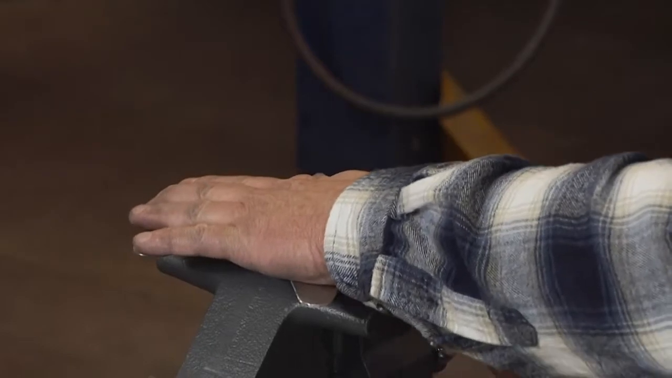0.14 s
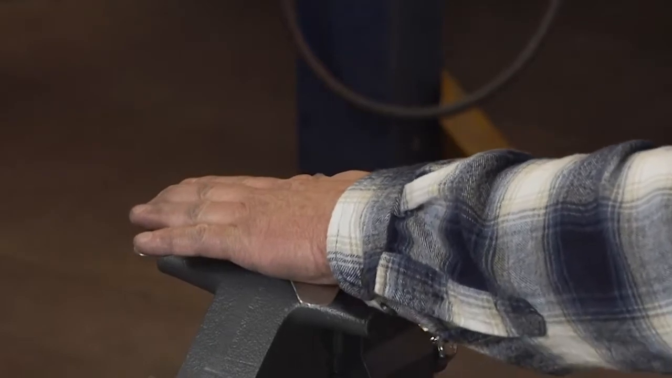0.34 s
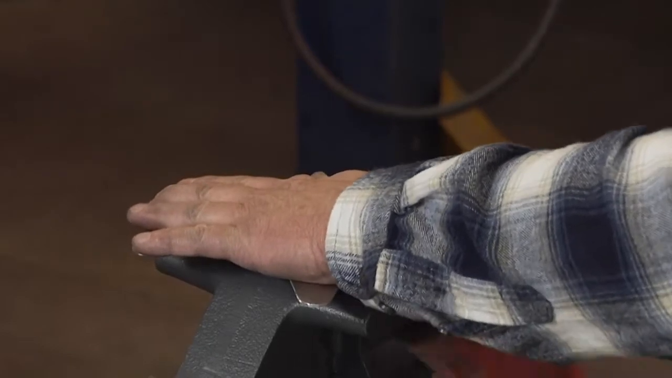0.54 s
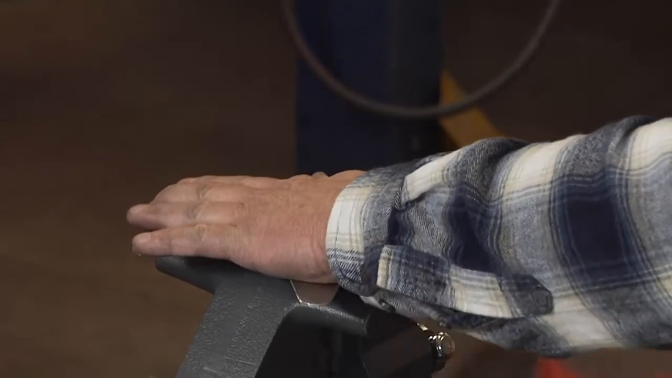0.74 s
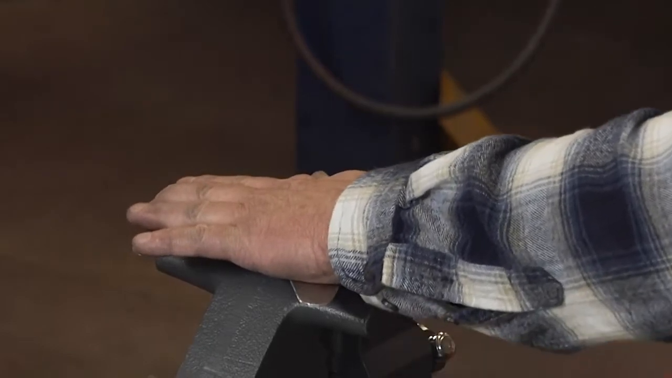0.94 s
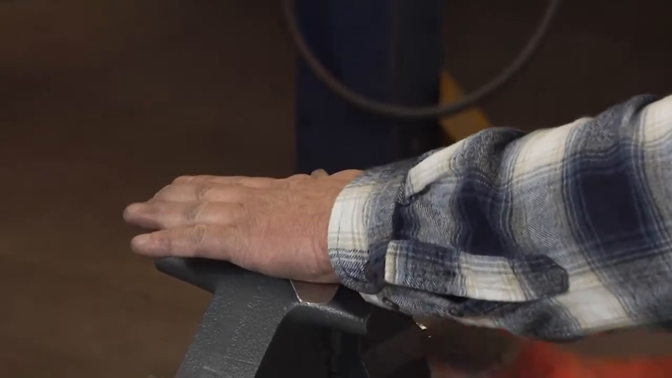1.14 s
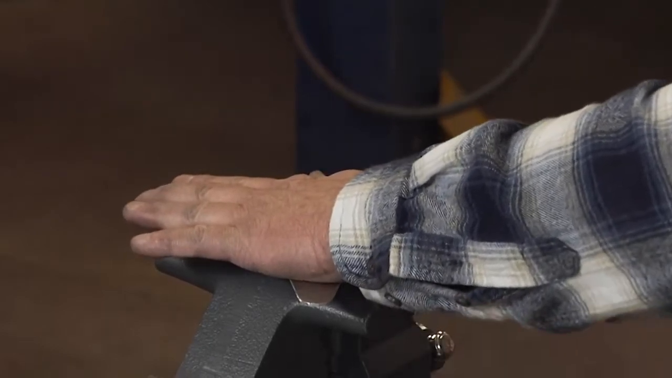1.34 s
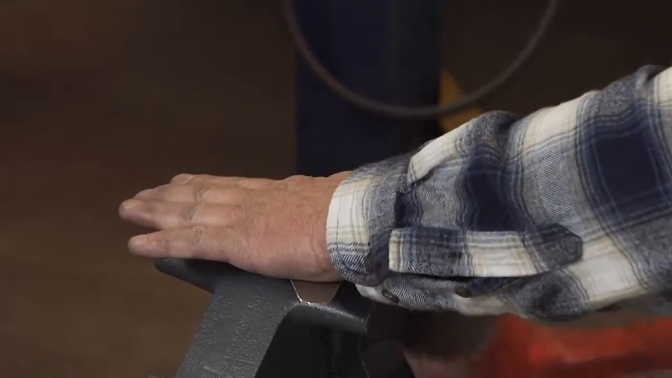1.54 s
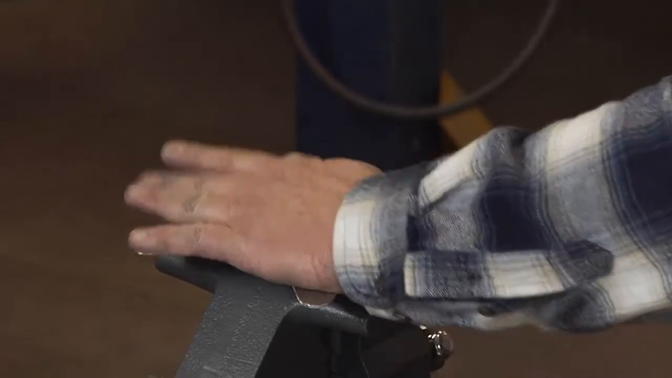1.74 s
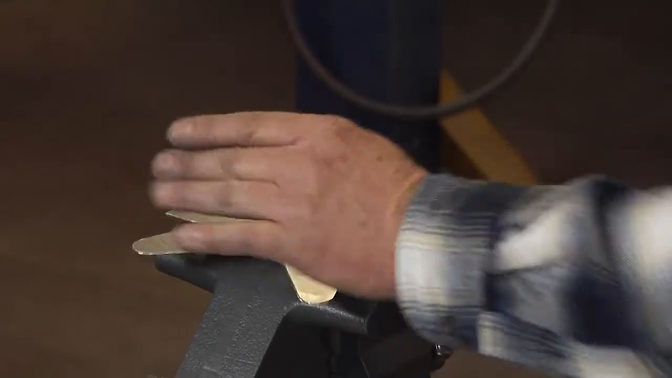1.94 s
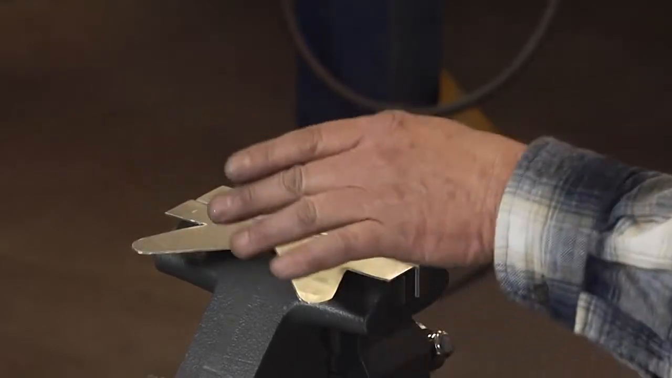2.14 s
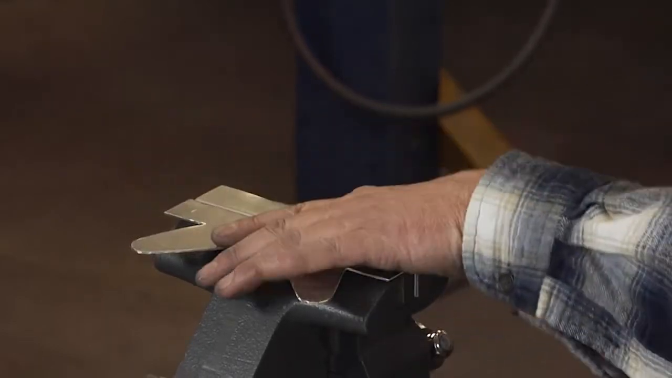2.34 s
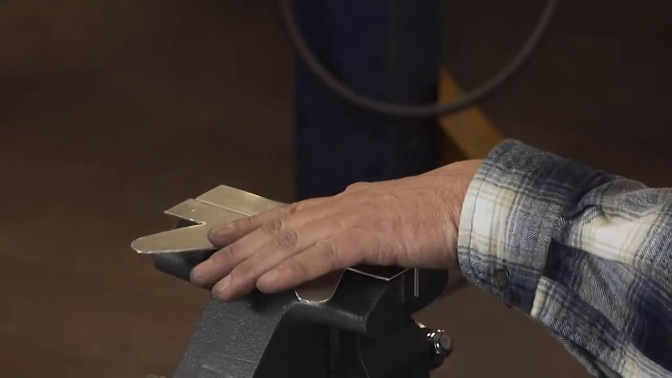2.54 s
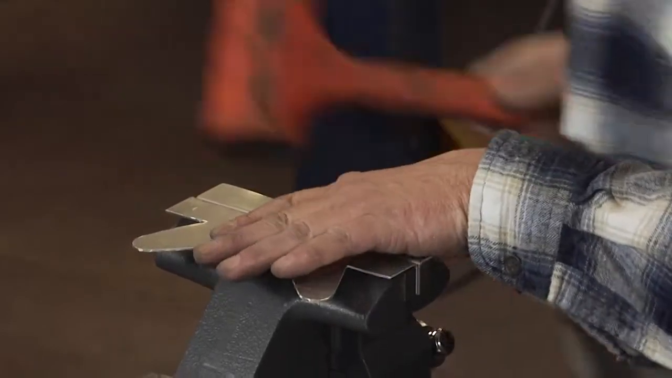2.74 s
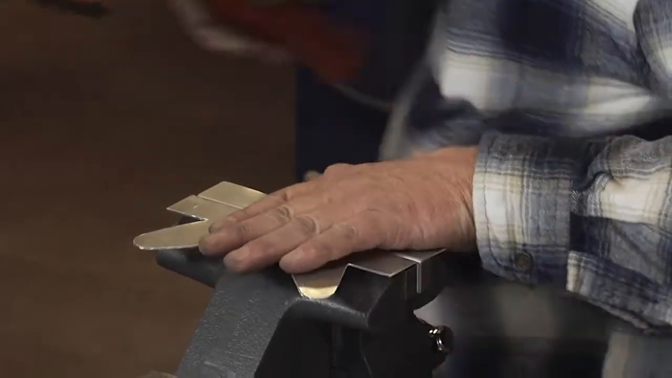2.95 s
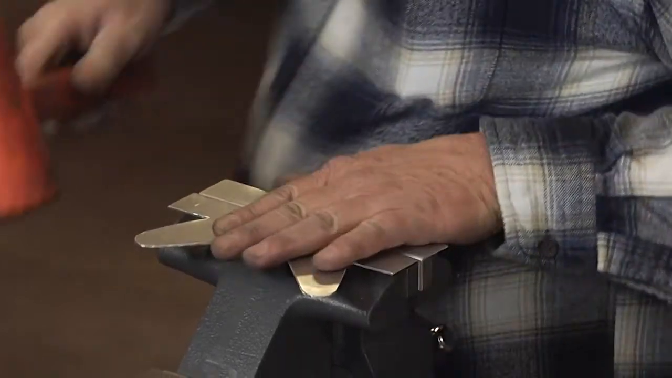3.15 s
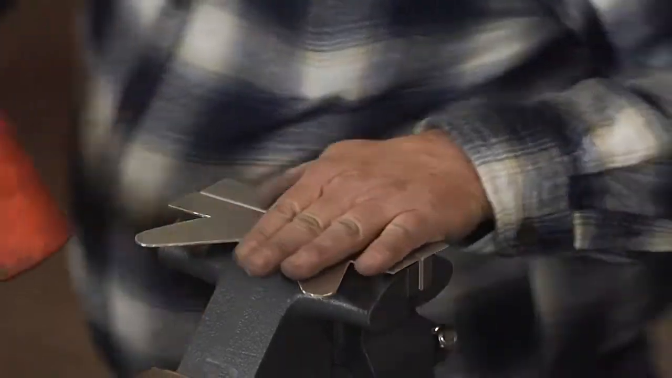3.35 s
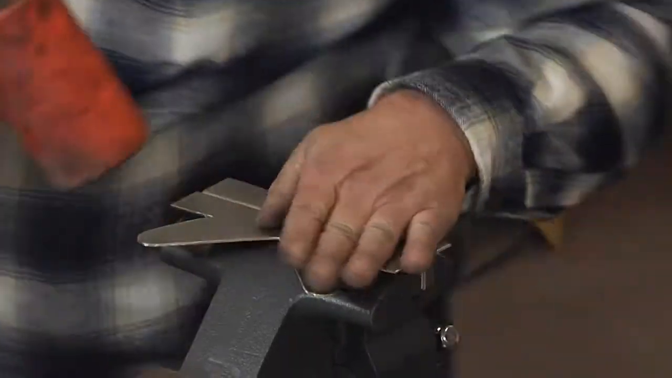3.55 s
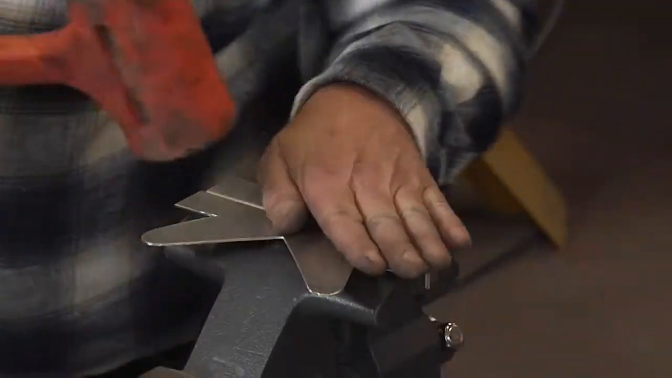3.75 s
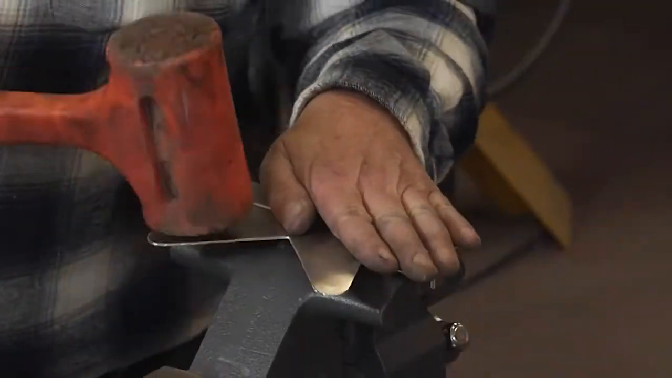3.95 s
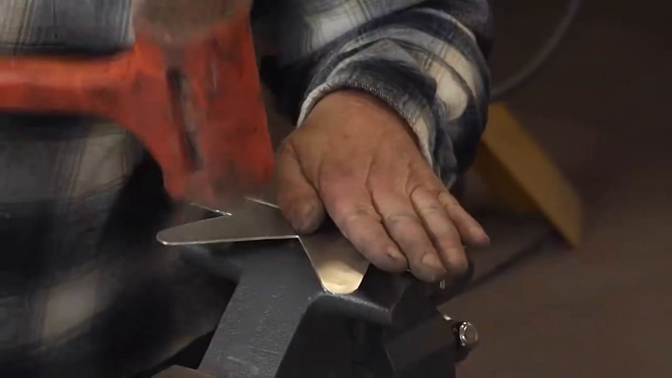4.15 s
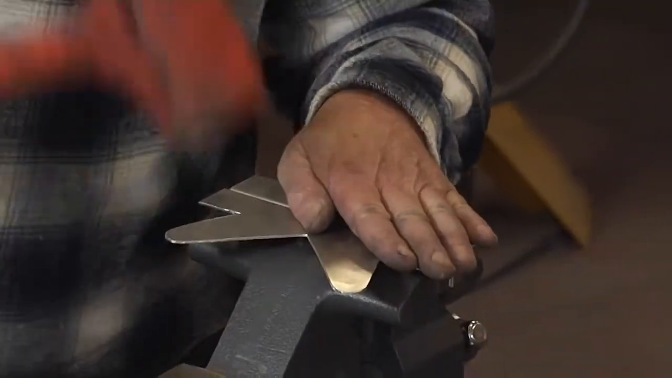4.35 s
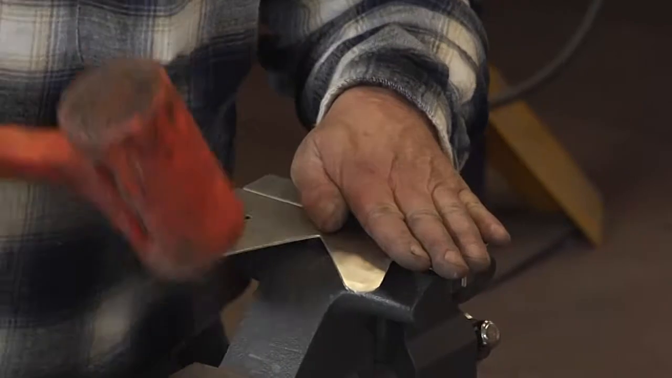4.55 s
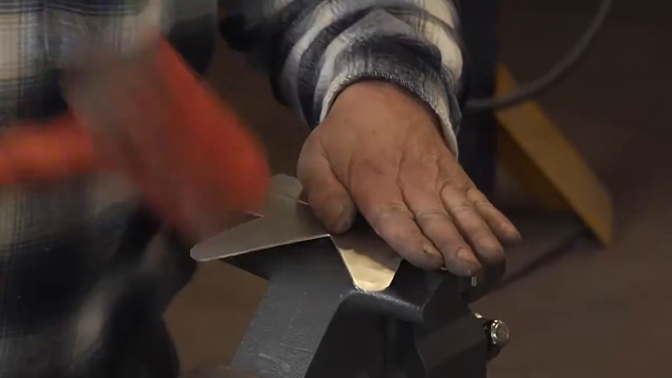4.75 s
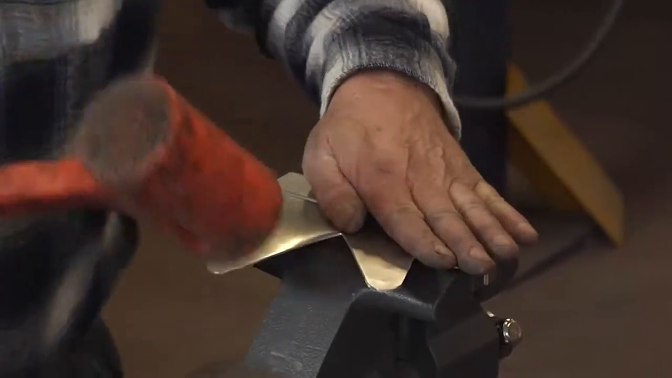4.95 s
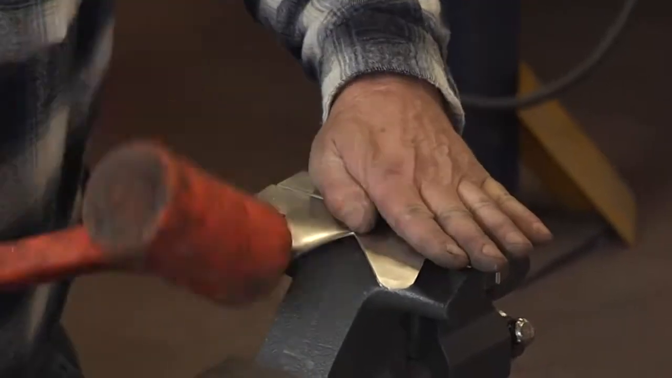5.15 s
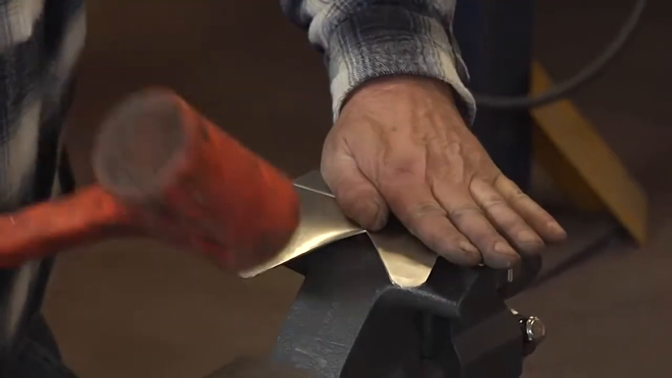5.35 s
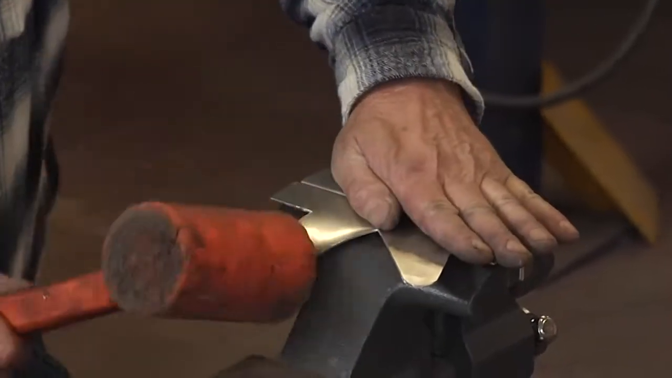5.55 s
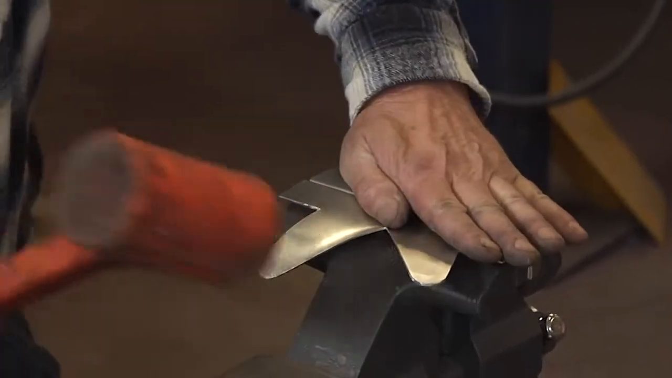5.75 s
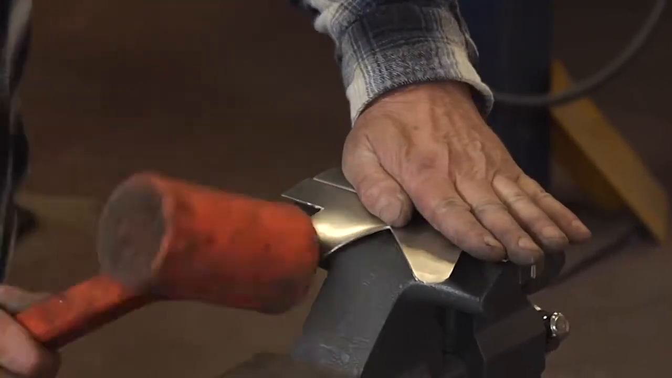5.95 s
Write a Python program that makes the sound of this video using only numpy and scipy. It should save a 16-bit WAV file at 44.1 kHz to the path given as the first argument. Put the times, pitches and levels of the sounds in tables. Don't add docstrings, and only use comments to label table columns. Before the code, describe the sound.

Close microphone at a steel vise in a large echoing workshop. Four hard mallet blows slap thin aluminium against the jaws, with brief chatter, thump and shot rattle. The echo fades into low room rumble while sleeves rustle, feet shuffle and pellets tick. Then a light tap with tiny rebounds, followed by five blows with a short, hollow sheet ring, each preceded by a hissing slide of shot.

```python
import sys
import numpy as np
from scipy import signal
from scipy.fft import rfft, irfft
from scipy.io import wavfile
from scipy.ndimage import uniform_filter1d

SR = 44100
rng = np.random.default_rng(int(sys.argv[2]) if len(sys.argv) > 2 else 0)


def to_linear_factor(level_db):
    exponent = np.asarray(level_db, float) / 20
    return 10 ** exponent


def waveform_to_disk(signal):
    frames = np.transpose(np.atleast_2d(signal))
    scaled = np.clip(frames, -1, 1) * 32767
    samples = np.round(scaled).astype(np.int16)
    wavfile.write(sys.argv[1], SR, samples)


N = 268569

# start_s, peak_db, bending_hz, upper_mode_db, ring_ms
FLAPS = [
    (3.9382, -17, 970, -1.5, 2.14),
    (4.0235, -30, 837, -11.5, 2.8),
    (4.085, -37.5, 1190, -9.5, 4.3),
    (4.4298, -9, 908, 2, 4),
    (4.8123, -10.5, 813, 1.5, 3.05),
    (5.1685, -10, 919, 2.5, 1.95),
    (5.5427, -8, 824, -3, 2.1),
    (5.974, -19.5, 772, 5.5, 5.3),
]
# arrival_s, rms_db, length_ms, slide_before_ms, shell_thud_db
SWINGS = [
    (2.315, -75, 40, 1.1, 20.5),
    (4.043, -54.5, 26.5, 1, 6),
    (4.375, -45, 25, 46, -1),
    (4.766, -43.5, 25.2, 44, -3.5),
    (5.121, -44, 23.7, 38, 1),
    (5.503, -43, 22.7, 41, 3.5),
    (5.902, -45, 38.7, 35, -2),
]
TURN_S = 3
BAND_HZ = 30 * 2 ** np.arange(0, 9.5, .5)


def secs(length):
    return np.arange(int(max(length, .0005) * SR)) / SR


def fade(t, t60):
    return np.exp(-np.log(1000) * t / max(t60, 1e-4))


def add(track, s, x):
    i = int(s * SR)
    track[i:i + len(x)] += x[:N - i]


def shape(x, gain):
    return irfft(rfft(x) * gain(np.arange(len(x) // 2 + 1) * SR / len(x) + 1e-3), len(x))


def curve(points):
    hz, db = np.transpose(points)
    return lambda f: to_linear_factor(np.interp(np.log(f), np.log(hz), db))


def peak(hz, width):
    return lambda f: 1 / np.sqrt(1 + ((f - hz ** 2 / f) / width) ** 2)


def noise(gain, size=N):
    x = shape(rng.standard_normal(size), gain)
    return x / x.std()


def flicker(size):
    return uniform_filter1d(np.repeat(rng.standard_normal(N // size + 1), size)[:N], size)


def no_bass(x, hz):
    return signal.sosfilt(signal.butter(2, hz, "high", fs=SR, output="sos"), x)


def flap():
    # mode_hz, level_db, t60_ms
    edge_modes = [(1350, 4.5, 6.4), (2020, -15.5, 7.9), (3640, -5.5, 11), (5570, -3.5, 10), (7200, -9, 4.7),
                  (8120, 1, 2.7), (11000, 5, 2.8)]
    upper_hz = 3186
    soft_below_db, dull_db_per_octave = -8, 0.5
    out, t = np.zeros(N), secs(.08)
    phases = rng.uniform(0, 2 * np.pi, (len(FLAPS), len(edge_modes)))
    crack = noise(peak(3200, 5100))

    def held(hold_ms):
        choked = np.exp(-(1000 * t / hold_ms) ** 2) + .12 * fade(t, .05)
        return (1 - np.exp(-t / .0008)) * choked

    for (s, db, hz, upper_db, ms), phase in zip(FLAPS, phases):
        upper = to_linear_factor(upper_db) * held(0.91 * ms) * np.sin(2 * np.pi * upper_hz * t)
        bending = held(1.13 * ms) * np.sin(2 * np.pi * hz * t)
        dull_db = dull_db_per_octave * np.clip(soft_below_db - db, 0, 9)
        edge = to_linear_factor(-dull_db) * 0.65 * crack[int(s * SR):][:len(t)] * fade(t, 0.018)
        for (f, mode_db, t60_ms), p in zip(edge_modes, phase):
            mode_gain = to_linear_factor(mode_db - dull_db * np.log2(f / 3000))
            edge += mode_gain * np.sin(2 * np.pi * f * t + p) * fade(t, t60_ms / 1000)
        edge *= to_linear_factor(-4.5 + upper_db) * (1 - np.exp(-t / 0.0004))
        add(out, s, to_linear_factor(db) * (upper - bending + edge))
    return out


def clash():
    # start_s, peak_db, length_ms, thump_db, thump_hz
    clashes = [
        (.0157, -13, 2.3, -20, 900),
        (.0183, -12, 1.8, 0, 900),
        (.5547, -11, 4, -4, 500),
        (.5737, -19, 1.5, 6, 400),
        (1.0288, -6, 2.6, -2, 520),
        (1.4617, -6, 2.5, 1, 600),
        (4.8206, -10.5, 1.3, -6, 700),
        (5.1733, -10.5, 2.6, 0, 480),
        (5.5466, -10, 2.6, 4, 560),
        (5.9772, -8, 2.4, -6, 550),
    ]
    # point_hz, level_db
    colour = [(410, -43.5), (700, -2), (1970, -3.5), (2800, 1), (3890, -7.5), (6230, -7), (7490, -8.5),
              (8420, -3), (9230, -22), (10500, -6.5), (13500, -27), (15000, -49.5), (16000, -63.5)]
    hidden_top_db, open_top_db = -9.5, 0
    out, t = np.zeros(N), secs(0.019)
    top, chatter = noise(peak(12000, 5000)), noise(curve(colour))
    for s, db, ms, thump_db, hz in clashes:
        span = ms / 1000
        i = slice(int(s * SR), int(s * SR) + len(t))
        top_db = open_top_db if s > TURN_S else hidden_top_db
        swell = np.clip(.5 + .5 * t / span, 0, 1) * fade(np.maximum(t - span, 0), .005)
        x = swell * (chatter[i] + to_linear_factor(top_db) * fade(t, .012) * top[i])
        add(out, s, to_linear_factor(db) * x / np.abs(x).max())
        thump = np.sin(2 * np.pi * hz * t) * fade(t, 6 / hz)
        add(out, s + 0.732 * span, to_linear_factor(db + thump_db) * thump)
    return out


def pellets():
    # centre_hz, width_hz
    modes = [
        (4350, 1100),
        (9800, 6500),
        (15200, 1500),
    ]
    hits = rng.standard_normal((3, N)) * to_linear_factor(1.6 * rng.exponential(size=N))
    layers = []
    for x, (hz, width) in zip(hits, modes):
        x = shape(shape(x, peak(hz, width)), peak(hz, 1.2 * width))
        layers.append(x / x.std())
    return np.array(layers)


def shaking():
    # time_s, level_db
    carry = [(2.62, -82), (2.89, -69.5), (2.935, -67), (3.15, -61), (3.29, -69), (3.44, -68.5),
             (3.57, -60.5), (3.79, -71), (3.89, -91)]
    return to_linear_factor(np.interp(np.arange(N) / SR, *np.transpose(carry), -120, -120))


def shot():
    # start_s, rms_db, length_ms, top_db
    landings = [(.026, -46, 15, 9), (.033, -37, 4.1, -6), (.14, -60, 29, 20), (.56, -36, 11, 4),
                (.682, -55.5, 30, 15), (1.036, -41.5, 26, -16.5), (1.09, -54.5, 100, 2.5),
                (1.54, -53.5, 79, 8.5), (4.446, -27, 7.6, -9), (4.831, -29, 8.1, 8),
                (5.179, -32.5, 14.4, -2), (5.551, -33.5, 18.4, 2), (5.986, -24.5, 5.6, -1)]
    # start_s, peak_db, pitch_hz
    ticks = [(2.548, -45.5, 2500), (2.927, -38, 10980), (3.017, -58.5, 10000), (3.0994, -37, 10500),
             (3.113, -51, 10500), (3.1514, -32, 11000), (3.165, -35, 10500), (3.191, -37, 10500),
             (3.274, -55, 10000), (3.9295, -29, 4300), (3.958, -63, 4000), (4.033, -39, 8000),
             (4.0788, -47, 9000), (4.09, -61, 9000), (4.109, -40, 9000), (4.141, -50, 8000),
             (4.328, -40.5, 7000), (4.343, -44, 9000), (4.307, -44, 4530), (4.355, -37, 4260),
             (3.58, -50.5, 5500), (.064, -22, 7200), (1.057, -39, 7500), (4.8048, -40, 9000),
             (.513, -45, 7970), (.54, -50, 5000)]
    level = np.zeros((3, N))
    bursts = [(s, db, ms, -6, top_db, (.4, .4, .4), .7, 3.8) for s, db, ms, top_db in landings]
    bursts += [(s, db, ms, -3, 6, (.4, 0.17, .05), 1.02, 1.84) for s, db, ms, *_ in SWINGS]
    for s, db, ms, cavity_db, top_db, rises, hold, t60 in bursts:
        u = secs(3 * ms / 1000) * 1000 / ms
        for row, rel_db, rise in zip(level, (cavity_db, 0, top_db - 14), rises):
            pour = np.minimum(u / rise, 1) * fade(np.maximum(u - hold, 0), t60)
            add(row, s, to_linear_factor(db + rel_db) * pour)
    for s, db, _, ms, _ in SWINGS:
        u = secs(2 * ms / 1000) * 1000 / ms
        slide = np.minimum(u, 1) ** 0.53 * fade(np.maximum(u - 1, 0), 0.78)
        for row, rel_db in zip(level, (3.5, 0, -30)):
            add(row, s - ms / 1000, to_linear_factor(db - 13 + rel_db) * slide)
    carried_db = np.array([[-11.5], [-3], [-17]])
    level += shaking() * to_linear_factor(carried_db)
    out, t = (level * pellets()).sum(axis=0), secs(.004)
    for s, db, hz in ticks:
        add(out, s, to_linear_factor(db) * np.sin(2 * np.pi * hz * t) * fade(t, .001))
    return out


def shell():
    out, rush = np.zeros(N), noise(peak(800, 730))
    for s, db, ms, _, thud_db in SWINGS:
        add(out, s, to_linear_factor(db + thud_db) * np.hanning(len(secs(1.23 * ms / 1000))))
    return out * rush


def vise():
    vise_modes = {"lip": (1280, 200, .05), "screw": (5230, 150, .5), "nut": (5430, 150, .9),
                  "tab": (2800, 500, .015), "jaw": (6125, 90, .6), "slide": (9260, 110, .38),
                  "plate": (9950, 70, .22), "bar": (11590, 65, .6)}
    # start_s, mode_name, level_db
    wakes = [(.018, "lip", -25), (1.0298, "tab", -15), (0.554, "lip", -43.5), (1.462, "lip", -21),
             (5.549, "lip", -22), (.03, "plate", -59.5), (.57, "jaw", -60), (.57, "plate", -52),
             (1.035, "screw", -44.5), (1.049, "nut", -51), (1.058, "jaw", -42.5), (1.04, "plate", -41),
             (1.471, "jaw", -45.5), (1.47, "slide", -61), (4.83, "jaw", -64), (4.86, "bar", -65),
             (5.19, "jaw", -55), (5.18, "slide", -50), (5.2, "bar", -67), (5.55, "jaw", -56),
             (5.58, "plate", -50), (6.012, "jaw", -46), (6.012, "plate", -35.5)]
    # start_s, centre_hz, width_hz, level_db, t60_s
    scrapes = [(.58, 510, 390, -24, 0.48), (2.319, 2300, 242, -58.5, 0.26), (2.32, 1350, 400, -63, 0.85),
               (2.92, 15300, 500, -67, 0.31), (3.11, 4550, 900, -58, 0.58), (3.3, 3040, 600, -68, 0.57),
               (3.49, 3050, 300, -63, 0.44), (3.62, 3040, 300, -67, .2), (3.94, 1010, 773, -31, 0.042),
               (3.94, 3950, 700, -54.5, .5), (3.62, 950, 200, -62, .15)]
    # centre_hz, width_hz, level_db, t60_s
    singing = [
        (930, 200, -57, .2),
        (2300, 280, -30.5, 0.42),
        (2720, 300, -51, .55),
        (3270, 430, -55, .7),
        (5860, 340, -42.5, 0.79),
    ]
    fold_from_s, fold_db_per_s = 5.1, 26
    soft_below_db = -8
    out, t = np.zeros(N), secs(1.0)
    rings = list(scrapes)
    for s, mode, db in wakes:
        hz, width, t60 = vise_modes[mode]
        rings.append((s, hz, width, db, t60))
    for s, blow_db, _, upper_db, _ in FLAPS:
        free_db = blow_db + upper_db - fold_db_per_s * max(s - fold_from_s, 0)
        free_db -= max(soft_below_db - blow_db, 0)
        rings += [(s + .005, hz, width, free_db + db, t60) for hz, width, db, t60 in singing]
    for s, hz, width, db, t60 in rings:
        cluster = noise(lambda f: peak(hz, width)(f) ** 2, size=len(t))
        attack_s = 0.011 if width > 220 and db < -53 else .0013
        add(out, s, to_linear_factor(db) * cluster * fade(t, t60) * np.minimum(t / attack_s, 1))
    return out


def bumps():
    # start_s, peak_db, pitch_hz, t60_ms
    knocks = [
        (0.514, -29, 215, 13),
        (2.996, -37, 167, 24),
        (3.263, -41, 300, 42),
        (3.284, -45, 300, 120),
        (4.029, -34, 346, 33),
        (3.94, -53.5, 30.2, 180),
        (4.43, -39, 30, 160),
    ]
    out, t = np.zeros(N), secs(.2)
    for s, db, hz, t60_ms in knocks:
        knock = np.sin(2 * np.pi * hz * t) * fade(t, t60_ms / 1000)
        add(out, s, to_linear_factor(db) * knock * np.minimum(t / 0.0006, 1))
    return out


def half_octave(f0):
    return lambda f: np.clip(1 - 2 * np.abs(np.log2(f / f0)), 0, 1)


def decay(t, f0):
    # centre_hz, near_t60_s, far_t60_s, far_db
    echo_bands = [(40, 0.37, 2.4, -22), (111.7, 0.44, 2.7, -14), (300, 0.77, 2.2, -6.5),
                  (740, 0.13, 1.37, -4), (2090, 0.16, 1.33, -0.5), (4870, 0.97, 0.3, -1.5),
                  (10000, 0.35, 0.68, -7.5), (16000, 0.18, 0.44, -7.5)]
    hz, *columns = np.transpose(echo_bands)
    near, far, far_db = (np.interp(np.log(f0), np.log(hz), c) for c in columns)
    return fade(t, near) + to_linear_factor(far_db) * fade(t, far)


def bench():
    # start_s, weight_db, seating_db, slap_db
    blows = [(0.019, -28.5, -27.5, -37), (0.556, -26, -21, -34.5), (.575, -42, -34, -67),
             (1.031, -24, -25.5, -33.5), (1.462, -27.5, -24.5, -31.5), (3.941, -69, -43.5, -66),
             (4.428, -29, -34, -37.5), (4.817, -29, -29.5, -41), (5.171, -28, -24, -39),
             (5.547, -27, -21, -39), (5.977, -20, -27.5, -32)]
    # centre_hz, width_hz, level_db
    bench_modes = [(116, 18.2, 7), (193.8, 18, 4.5), (266.7, 12, 7), (311.5, 7.3, 2), (385, 26, -4),
                   (498.6, 23, -3), (730.4, 20, 0.5)]
    # centre_hz, width_hz, level_db
    steel_modes = [(940, 32, -21.5), (1150, 230, -9), (2300, 90, -19), (3130, 110, -7), (4140, 140, -4),
                   (5204, 80, 6), (5540, 120, -5), (6000, 70, 1.5), (7300, 34.1, -8.5), (7000, 47, -6.5),
                   (7300, 180, 2), (8770, 49, -5.5), (9800, 55, 3.5), (9960, 110, 2), (10500, 87, 1),
                   (11190, 50, -6.5), (14800, 110, -7)]
    # point_hz, level_db
    weight_colour = [(22, -15), (110, 2), (300, -8.5), (750, -31.5)]
    # point_hz, level_db
    seating_colours = [
        [(110, -9.5), (300, 2.5), (750, 1), (2000, -13), (7000, -30.5)],
        [(110, -10.5), (300, -5.5), (750, 3.5), (2000, -9), (7000, -28)],
    ]
    # point_hz, level_db
    slap_colour = [(300, -4.5), (750, 9), (2000, 2.5), (7000, -1), (16000, 1.4)]

    def modes(f):
        return 1 + sum(to_linear_factor(db) * peak(hz, width)(f) ** 2 for hz, width, db in bench_modes + steel_modes)

    source, out, t = noise(modes), np.zeros(N), secs(2.8)
    for f0 in BAND_HZ:
        power = np.zeros(N)
        tail = decay(t, f0) ** 2 * np.minimum(t / (.005 + 1.5 / f0), 1)
        for s, *parts_db in blows:
            on_top = int(s > TURN_S)
            colours = weight_colour, seating_colours[on_top], slap_colour
            weight, seating, slap = ((to_linear_factor(db) * curve(c)(f0)) ** 2 for db, c in zip(parts_db, colours))
            rise_s = 0.073 if on_top else .02
            add(power, s, tail * (weight * np.minimum(t / rise_s, 1) ** 2 + seating + slap))
        rattle = to_linear_factor(2 * flicker(size=150) * (f0 > 1500))
        out += rattle * shape(source, half_octave(f0)) * np.sqrt(power * 2000 / f0)
    return out


def hall():
    t = secs(2.8)
    white = rng.standard_normal(len(t))
    out = sum(shape(white, half_octave(f0)) * decay(t, f0) for f0 in BAND_HZ)
    return out * np.minimum(t / 0.0016, 1)


def earlier_blow():
    return noise(peak(250, 400)) * to_linear_factor(-51.0) * fade(np.arange(N) / SR, 1.3)


def cloth():
    # point_hz, level_db
    rub_colour = [(250, -8.5), (1200, -11.5), (3000, -11), (6500, -8), (9000, -8), (13000, -26.5)]
    # middle_s, rms_db, length_s
    shuffles = [
        (2.25, -65.5, 0.97),
        (3.305, -65, 0.92),
        (4.266, -66.5, 0.9),
    ]
    swell = np.zeros(N)
    for s, db, length in shuffles:
        add(swell, s - length / 2, to_linear_factor(db) * np.hanning(len(secs(length))))
    rub = to_linear_factor(-2.5 + 3.6 * flicker(size=300)) * shaking() * noise(curve(rub_colour))
    shuffle = swell * to_linear_factor(1.15 * flicker(size=900)) * noise(lambda f: peak(1000, 1800)(f) ** 2)
    return rub + shuffle


def room_floor():
    # point_hz, level_db
    floor_colour = [(12, -43.5), (20, -16.5), (96, 1.5), (198, 2), (367, 3.5), (558, -3.5), (949, -6.5),
                    (1120, -10), (1220, -9.5), (2020, -18), (9400, -26.5), (14700, -24), (16000, -52.5)]
    hiss = to_linear_factor(-86) * noise(peak(14950, 2943))
    return to_linear_factor(-60) * noise(curve(floor_colour)) + hiss


def scene():
    ringing = no_bass(no_bass(flap(), 250), 280)
    near = ringing + no_bass(clash(), 77) + shot() + shell() + bumps()
    echo = bench() + to_linear_factor(-52) * signal.fftconvolve(near, hall())[:N]
    background = earlier_blow() + cloth() + room_floor()
    return (near + vise() + echo + background)[None]


def roll_off(x):
    return signal.sosfilt(signal.butter(12, 16820, fs=SR, output="sos"), x)


def record(dry):
    mix = signal.sosfilt(signal.ellip(8, .2, 60, 16000, fs=SR, output="sos"), dry)
    return roll_off(mix)


dry = scene()
out = record(dry)
waveform_to_disk(out)
```